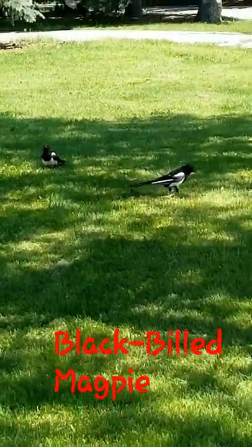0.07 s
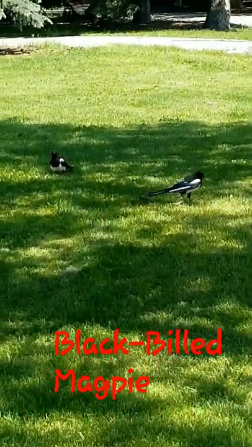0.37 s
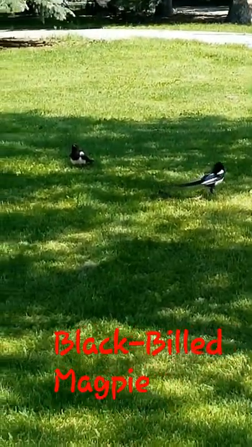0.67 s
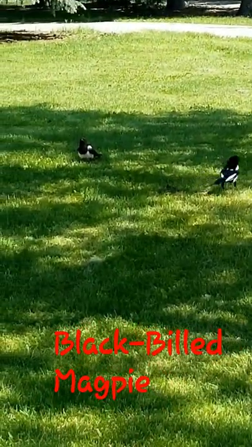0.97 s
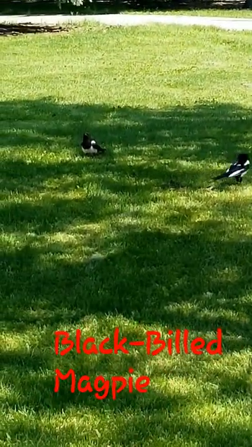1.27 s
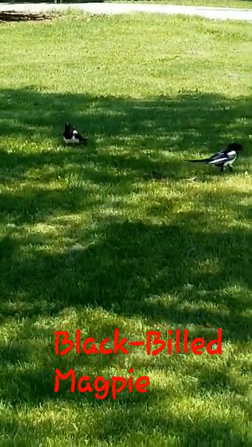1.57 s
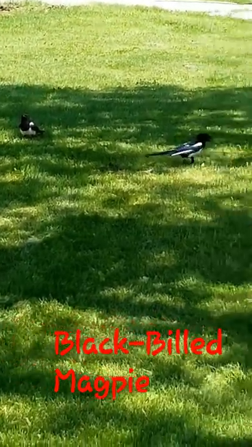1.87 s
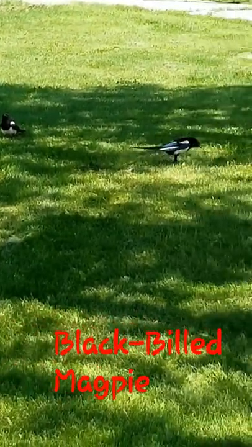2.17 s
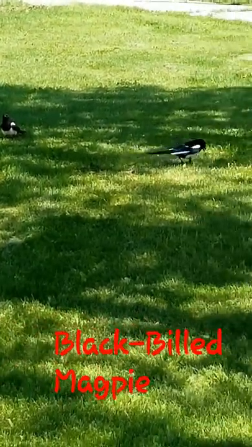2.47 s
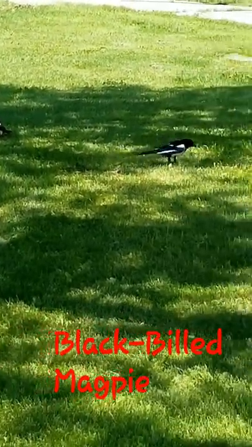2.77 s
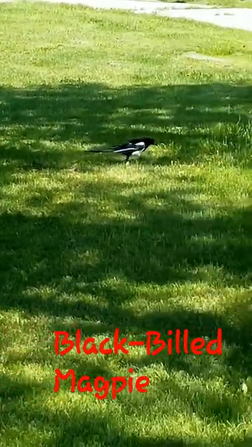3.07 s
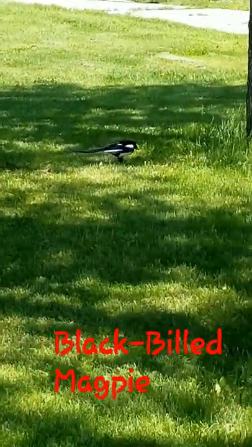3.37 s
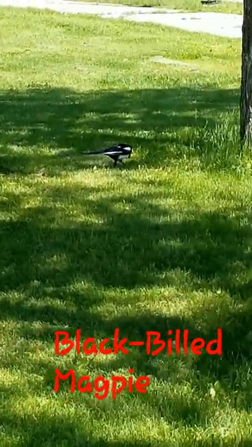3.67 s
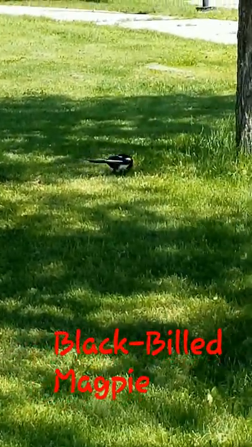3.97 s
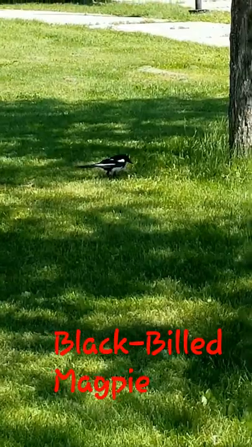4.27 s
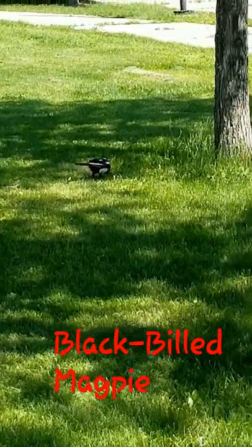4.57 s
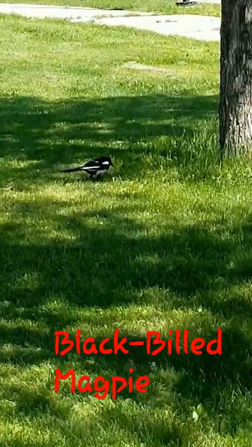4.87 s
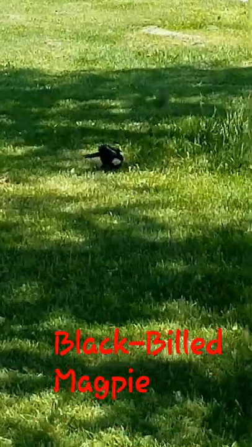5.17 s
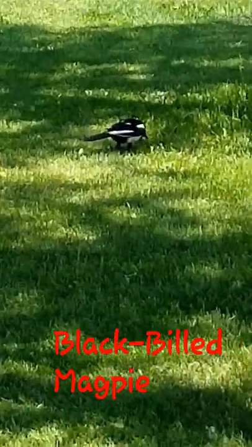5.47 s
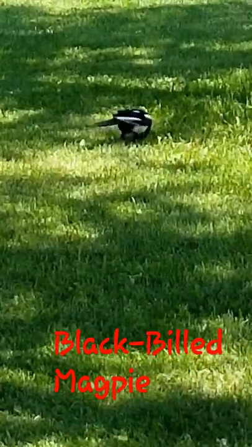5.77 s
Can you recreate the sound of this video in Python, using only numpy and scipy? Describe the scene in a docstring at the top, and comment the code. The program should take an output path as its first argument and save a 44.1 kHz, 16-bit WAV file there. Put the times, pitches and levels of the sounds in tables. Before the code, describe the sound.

A low engine drone runs throughout, slowly speeding up over a rumble of far traffic and soft wind on the microphones. In the first half, a magpie makes three short dry rasps while a songbird warbles and distant birds twitter faintly around the park. Near the end the vehicle goes by with a throbbing exhaust and a swell of tyre noise, then recedes. The right side sounds duller than the left.

```python
"""A park lawn beside a road

A vehicle's exhaust drones in harmonics of its engine cycle, slowly speeds up and goes by in a rush
of tyre noise. Distant traffic rumbles, a breeze flutters at the microphones and a thin hiss swells
briefly. A songbird warbles in gliding tones, scattered by the trees, and far birds twitter; a nearer
bird gives three dry rasps of ringing clicks. The right microphone is duller than the left."""
import sys
import numpy as np
from scipy import signal
from scipy.fft import rfft, irfft, next_fast_len
from scipy.io import wavfile
from scipy.ndimage import uniform_filter1d, map_coordinates

SR = 44100
rng = np.random.default_rng(int(sys.argv[2]) if len(sys.argv) > 2 else 0)


def transcribe(u):
    """Save the signal u as a 16-bit wav file named by the first command-line argument.

    u: samples, shape (n,) or (channels, n), limited to [-1, 1]; the rate is SR.
    q: integer samples, one column per channel.
    """
    v = np.clip(np.atleast_2d(u).T, -1, 1)
    q = np.round(v * 32767).astype(np.int16)
    wavfile.write(sys.argv[1], SR, q)


N = 256662
T = np.arange(N) / SR


def amp(db):
    """Amplitude ratio of a level in decibels."""
    return 10 ** (np.asarray(db) / 20)


def unit(x):
    """Normalisation to an rms of 1."""
    return x / np.sqrt(np.mean(x ** 2) + 1e-20)


def along(points, hz):
    """Interpolation of (f, value) points on a logarithmic frequency axis."""
    f, value = np.transpose(points)
    return np.interp(np.log(hz + 1), np.log(f + 1), value)


def curve(points):
    """Linear interpolation of (t, value) points at every sample."""
    return np.interp(T, *np.transpose(points))


def wobble(rate):
    """Smooth random modulation: a spline through rate Gaussian knots a second."""
    return map_coordinates(rng.standard_normal(int(N * rate / SR) + 4), [T * rate])


def filtered(x, response):
    """Linear filtering: the spectrum of x is multiplied by a frequency response."""
    size = next_fast_len(N + SR // 2)
    return irfft(rfft(x, size) * response(np.fft.rfftfreq(size, 1 / SR)), size)[..., :N]


# likeness of the ambient sound at left and right: f/Hz, correlation
AMBIENT_CORRELATION = [(30, 0.44), (100, 0.99), (300, 0.95), (650, 0.94), (1300, 0.6), (1900, 0.7),
                       (3000, 0.22), (6000, 0.15), (12000, 0.05)]
def rush(spectrum, patchy_db, correlation=AMBIENT_CORRELATION):
    """Partially coherent stereo noise of rms 1, its level varying in patches of time and frequency."""
    def mid_side_gains(hz):
        angle = np.arccos(np.clip(along(correlation, hz), -1, 1)) / 2
        return amp(along(spectrum, hz)) * [np.cos(angle), np.sin(angle)]
    cells = signal.stft(rng.standard_normal((2, N)), nperseg=512)[2]
    patches = uniform_filter1d(rng.standard_normal(cells.shape[1:]), size=5, axis=0)
    patches = unit(uniform_filter1d(patches, size=16, axis=1))
    noise = signal.istft(cells * amp(patchy_db * patches), nperseg=512)[1][:, :N]
    mid, side = filtered(noise, mid_side_gains)
    return unit(np.array([mid + side, mid - side]))


# spectra of a low rumble and of an even background hiss, notched near 9 kHz: f/Hz, relative level/dB
RUMBLE_SPECTRUM = [(20, -38), (33, -18), (45, -9), (65, 3), (85, 2.5), (135, -2), (170, -10), (240, -10.5),
                   (310, -25.5), (450, -30.5), (900, -81)]
BACKGROUND_SPECTRUM = [(100, -16.5), (300, 3), (650, 1), (1000, -2), (1600, -5.5), (2100, -10.5),
                       (2700, -14.5), (4000, -20), (5500, -25.5), (7600, -25), (9300, -50), (11200, -31),
                       (14500, -33)]
# their envelopes: t/s, level/dB
RUMBLE_LEVEL = [(0, -34), (.55, -34.5), (1.7, -34), (2.7, -36), (3.6, -35.5), (4.5, -30.5), (5.82, -34.5)]
BACKGROUND_LEVEL = [(0, -48.5), (2.2, -48.5), (3, -47.5), (3.8, -48.5), (5.82, -49)]
def background():
    """Incoherent addition: distant traffic merges into a low rumble, heard under an even hiss."""
    rumble = amp(curve(RUMBLE_LEVEL)) * rush(RUMBLE_SPECTRUM, patchy_db=0.82)
    hiss = amp(curve(BACKGROUND_LEVEL) + 0.12 * wobble(3.5)) * rush(BACKGROUND_SPECTRUM, patchy_db=0.82)
    return rumble + hiss


# spectrum of wind pressure: f/Hz, relative level/dB
BREEZE_SPECTRUM = [(20, -28), (35, -8), (50, 6), (70, -2), (130, -20.5), (300, -73.5)]
def breeze(left_db=-46.5, right_db=-53.5, gust_db=3):
    """Turbulence: pressure flutters independently at each microphone; the left faces the breeze."""
    flutter = unit(filtered(rng.standard_normal((2, N)), lambda hz: amp(along(BREEZE_SPECTRUM, hz))))
    gusts = amp(gust_db * wobble(3.9))
    return amp([[left_db], [right_db]]) * gusts * flutter


# envelope of the drone at the firing frequency: t/s, level/dB
DRONE_LEVEL = [(0, -35.5), (1.2, -31), (1.8, -45), (1.95, -31), (2.35, -31.5), (2.6, -28), (2.76, -34.5),
               (2.93, -27), (3.25, -29), (3.5, -33), (4.05, -34), (4.27, -27), (4.48, -29), (4.59, -38),
               (4.66, -28.5), (4.99, -24.5), (5.15, -36.5), (5.27, -27), (5.4, -38), (5.6, -30),
               (5.82, -39.5)]
# low harmonics of the engine cycle, swelling in turn: order, peak level/dB, peak t/s, slope/(dB/s)
LOW_ORDERS = [(2, -36, 4.85, 8), (3, -35, 6.2, 20.5), (4, -32.5, 5.55, 17.5)]
# surges of harshness in the exhaust: t/s, relative level/dB
THROB_LEVEL = [(0, -4.5), (1.5, -10), (2.85, -6), (3.1, 0), (3.35, -5.5), (4.0, -5), (4.33, 0), (4.5, -0.5),
               (4.66, 3.5), (4.79, -1.5), (4.97, 3.5), (5.13, 2), (5.4, -23)]
# upper harmonics: order, base level/dB, multiplier of the throb level
UPPER_ORDERS = [(6, -43, 2.5), (7, -45, 0.46), (8, -46, 0.95), (9, -39, 1.9), (10, -52, 0.93),
                (11, -51.5, 0.51), (12, -53, 0.4), (14, -56.5, 0.84)]
def exhaust(firing_phase, firings_per_cycle=5, floor_db=-47.5):
    """Harmonic series: periodic firing gives the drone, and uneven cylinders add the other orders."""
    tone = amp(curve(DRONE_LEVEL) + .8 * wobble(12)) * np.sin(firing_phase + .3 * wobble(10))
    levels = [(order, np.maximum(db - slope * np.abs(T - peak_s), floor_db))
              for order, db, peak_s, slope in LOW_ORDERS]
    levels += [(order, db + follow * curve(THROB_LEVEL)) for order, db, follow in UPPER_ORDERS]
    for order, level_db in levels:
        phase = order * firing_phase / firings_per_cycle + rng.uniform(0, 2 * np.pi) + 0.55 * wobble(9)
        tone += amp(level_db + 1.2 * wobble(7)) * np.sin(phase)
    return np.sqrt(2) * tone  # the levels are rms


# spectra of tyre hiss and of tread roar: f/Hz, relative level/dB
HISS_SPECTRUM = [(900, -30), (1500, -5.5), (1740, 0.5), (2100, -5), (2400, -1.5), (2720, -2.5), (3150, -8),
                 (4700, -16), (5400, -12.5), (6100, -22.5), (7700, -24.5), (9000, -53), (12000, -66.5)]
ROAR_SPECTRUM = [(150, -11.5), (350, 1), (520, -3), (660, 4.5), (820, -2), (950, 3.5), (1050, 4),
                 (1200, 0.5), (1700, -3), (2100, -18), (2640, -6), (3500, -58)]
# envelope of the tread roar: t/s, level/dB
ROAR_LEVEL = [(3.6, -69), (4.3, -53.5), (4.55, -52.5), (4.63, -43), (4.72, -46), (4.98, -44.5),
              (5.12, -47.5), (5.4, -69.5)]
# likeness of the vehicle's noise at left and right: f/Hz, correlation
VEHICLE_CORRELATION = [(100, 0.97), (900, 0.85), (1900, .72), (2800, 0.24), (4000, .45), (6000, .15)]
def road_noise(firing_phase, arrive_s=4.585, leave_s=5.073):
    """A passing noise source: tyres and body grow louder on approach and fade with distance."""
    approach_db = 30 * np.minimum(T - arrive_s, 0)
    abreast_db = 5 * (np.clip(T, arrive_s, leave_s) - arrive_s)
    recede_db = -47 * np.maximum(T - leave_s, 0)
    nearness = amp(approach_db + abreast_db + recede_db)
    hiss = amp(-50) * rush(HISS_SPECTRUM, patchy_db=1.3, correlation=VEHICLE_CORRELATION)
    roar = amp(curve(ROAR_LEVEL)) * rush(ROAR_SPECTRUM, patchy_db=2.5, correlation=VEHICLE_CORRELATION)
    body = amp(-39.5) * rush(RUMBLE_SPECTRUM, patchy_db=-1.0, correlation=VEHICLE_CORRELATION)
    puffs = 1 + 0.08 * np.sin(firing_phase)  # each firing pushes out a puff of noise
    return nearness * (body + hiss * puffs) + roar * puffs


# firing frequency, rising and then holding: t/s, f/Hz
FIRING_RATE = [(0, 94.05), (.5, 94.8), (2, 102), (4, 112.7), (5, 127.2), (5.82, 127)]
def vehicle():
    """Phase is the integral of frequency: one firing phase drives the exhaust and pulses the noise."""
    firing_phase = 2 * np.pi * np.cumsum(curve(FIRING_RATE)) / SR
    return exhaust(firing_phase) + road_noise(firing_phase)


# spectrum of the thin hiss: f/Hz, relative level/dB
SIZZLE_SPECTRUM = [(2000, -20.0), (5000, -6.0), (9000, -23.0), (11500, -1.0), (14500, -5.5)]
def sizzle(hold_from_s=.12, hold_to_s=.24, attack_s=.045, release_s=.08):
    """Exponential growth and decay: a thin high hiss swells, holds and fades to a faint tail."""
    swell = np.exp(np.minimum(T - hold_from_s, 0) / attack_s - np.maximum(T - hold_to_s, 0) / release_s)
    tail = amp(-65.5 - 8.5 * T)
    return np.maximum(amp(-56) * swell, tail) * rush(SIZZLE_SPECTRUM, patchy_db=3.5)


def trees(x, t60, wet_db):
    """Scattering: trunks and leaves add a decaying tail to a mono sound, different on each side."""
    t = T[:SR]
    tail = rng.standard_normal((2, SR)) * amp(-60 * t / t60) * (1 - np.exp(-t / 0.0013))
    scattered = signal.fftconvolve(x[None], tail / np.linalg.norm(tail[0]), axes=1)[:, :N]
    return x + amp(wet_db) * scattered


def whistle(length_s, pitches, flutter_hz=35, flutters_per_s=220):
    """Frequency modulation: a soft-edged syllable bends through three pitches with a quick flutter."""
    progress = np.linspace(0, 1, int(length_s * SR))
    flutter = map_coordinates(rng.standard_normal(SR // 100), [progress * length_s * flutters_per_s])
    hz = np.polyval(np.polyfit([0, .5, 1], pitches, 2), progress) + flutter_hz * flutter
    envelope = np.abs(np.sin(np.pi * progress)) ** .5
    return envelope * np.sin(2 * np.pi * np.cumsum(hz) / SR)


# syllables of the warble: t/s, duration/s, start f/Hz, end f/Hz, upward bow at the middle/Hz, level/dB
SYLLABLES = [(.175, .035, 4200, 4400, 50, -63), (.303, .034, 3900, 4020, 40, -58),
             (.425, .03, 4020, 3780, 0, -62), (.455, .03, 3880, 4100, 0, -62.5),
             (.513, .03, 3340, 3230, -20, -56), (.584, .03, 4420, 4200, 0, -60),
             (.618, .072, 4030, 3370, 60, -60), (.745, .04, 3330, 3830, 150, -56.5),
             (.955, .06, 3100, 3020, -50, -57), (1.047, .035, 3200, 3600, -80, -60.5),
             (1.078, .036, 3780, 3830, 30, -59.5), (1.118, .056, 4150, 3800, 71, -58),
             (1.213, .048, 3470, 3220, 0, -58.5), (1.24, .032, 4150, 4250, 0, -60),
             (1.255, .054, 3230, 3040, -30, -55), (1.33, .068, 4000, 3450, 34, -65),
             (1.445, .08, 2770, 2660, -40, -64), (1.461, .032, 3170, 3180, -10, -57),
             (1.59, .07, 2750, 2600, 0, -64.5), (1.79, .14, 3130, 3080, 0, -68),
             (2.075, .03, 3900, 3780, 0, -63), (2.102, .042, 3720, 3350, 40, -58.5),
             (2.292, .032, 2480, 3020, 0, -60), (2.324, .044, 3150, 3880, 150, -61.5),
             (2.49, .048, 3650, 3250, 0, -65), (2.61, .056, 3000, 2740, 0, -62.5),
             (2.668, .09, 3880, 3330, 210, -59.5)]
def songbird(burr_depth=.5, burr_rate=320):
    """Amplitude modulation: a rapid, rough flutter widens each whistled syllable into a burry note."""
    song = np.zeros(N)
    for onset, length_s, start_hz, end_hz, bow_hz, db in SYLLABLES:
        note = amp(db) * whistle(length_s, [start_hz, (start_hz + end_hz) / 2 + bow_hz, end_hz])
        song[int(onset * SR):][:len(note)] += note
    burr = 1 + burr_depth * wobble(burr_rate)
    flicker = amp(0.5 * wobble(44.7))  # moving leaves
    return trees(song * burr * flicker, t60=.42, wet_db=-9)


# rasps: t/s, base click level/dB, low mode f/Hz, its relative level/dB, high mode f/Hz,
# after-click relative level/dB, airy noise level/dB, closing tick level/dB
RASPS = [(.236, -41.5, 4700, 2, 7370, -2.5, -56.5, -40), (1.170, -49.5, 4750, -2, 7200, -2, -57.5, -43.5),
         (1.934, -40.5, 4750, -1, 6050, -13, -56.5, -42.5)]
# modes of the closing tick: f/Hz, relative level/dB, t60/s
TICK_MODES = [(2040, 1, 0.013), (2610, -1, 0.011), (2900, 2, 0.024), (3300, -9, .007)]
# spectrum of the snaps and airy noise: f/Hz, relative level/dB
RASP_SPECTRUM = [(2500, -9), (3800, -3.5), (4700, 4), (5300, 0), (5900, -1.5), (6400, -1), (7300, -2),
                 (8200, 0.5), (9300, -19.5), (12000, -17), (15000, -25)]
def rasping_bird(pairs=3, gap_s=.0172, after_s=.0066, growth_db=1, ring_t60=.013, tick_s=.0598):
    """Damped resonance: each rasp is pairs of ringing clicks over airy noise, closed by a lower tick."""
    noise_envelope, tones = np.zeros((2, N))
    t = T[:SR // 50]
    attack = 1 - np.exp(-t / .0004)
    snap = amp(-6.5) * t / .0005 * np.exp(1 - t / .0005)
    ring = amp(-1.5 - 60 * t / ring_t60) * attack
    tick = attack * sum(amp(db - 60 * t / t60) * np.sin(2 * np.pi * hz * t) for hz, db, t60 in TICK_MODES)
    for onset, click_db, low_hz, low_db, high_hz, after_db, air_db, tick_db in RASPS:
        noise_envelope += amp(air_db) * np.exp(-((T - onset - .033) / .043) ** 2)  # airy swell
        click = (0, click_db, [(low_hz, low_db), (high_hz, 0)])
        after_click = (after_s, click_db + after_db, [(high_hz, 0)])
        for k in range(pairs):
            for delay, db, modes in (click, after_click):
                start = int((onset + k * gap_s + delay) * SR)
                gain = amp(db + (k + 1) * growth_db)
                noise_envelope[start:][:len(t)] += gain * snap
                for hz, mode_db in modes:
                    mode = np.sin(2 * np.pi * hz * rng.normal(1, 0.011) * t)
                    tones[start:][:len(t)] += gain * amp(mode_db) * ring * mode
        tones[int((onset + tick_s) * SR):][:len(t)] += amp(tick_db) * tick
    noise = unit(filtered(rng.standard_normal(N), lambda hz: amp(along(RASP_SPECTRUM, hz))))
    return trees(tones + noise_envelope * noise, t60=.2, wet_db=-17)


def far_twitter(count=100, start_s=.8, span_s=2.5):
    """Spectral broadening: a buzzing delivery smears the glides of far birds into narrow-band noise."""
    twitter = np.zeros(N)
    for when, size, pitch, bend in rng.uniform(size=(count, 4)):
        glide_hz = (2700 + 1700 * pitch) * (1 + 0.51 * (bend - .5) * np.array([-1, 0, 1]))
        note = amp(-71.5 - 0.5 * size) * whistle(0.033 + .04 * size, glide_hz)
        twitter[int((start_s + when * span_s) * SR):][:len(note)] += note
    return trees(twitter * wobble(700), t60=0.18, wet_db=-3.0)


# swells of the far chorus: t/s, half width/s, level/dB
CHORUS_SWELLS = [(0.905, .04, -70), (1.263, 0.055, -62), (2.218, 0.034, -66), (2.385, .04, -66),
                 (2.894, 0.048, -69), (3.123, 0.053, -66)]
# its spectrum: f/Hz, relative level/dB
CHORUS_SPECTRUM = [(2800, -30), (3500, -2), (4300, -2), (4900, -5), (5600, -29.5)]
def far_chorus():
    """Incoherent addition: far birds blur into a band of noise that comes in soft Gaussian swells."""
    envelope = sum(amp(db) * np.exp(-((T - peak_s) / width) ** 2) for peak_s, width, db in CHORUS_SWELLS)
    return envelope * rush(CHORUS_SPECTRUM, patchy_db=4.0)


def aside(pair, lag_samples):
    """Direction by time difference: a positive lag delays the right channel, placing a sound left."""
    delays_s = np.array([[0], [lag_samples]]) / SR
    return filtered(pair, lambda hz: np.exp(-2j * np.pi * hz * delays_s))


def scene():
    """Superposition: the vehicle and the birds lie on different sides within the ambient noise."""
    ambience = background() + breeze() + sizzle()
    road = aside(vehicle(), lag_samples=1.8)
    birds = aside(songbird() + rasping_bird() + far_twitter() + far_chorus(), lag_samples=-3.6)
    return ambience + road + birds


# imbalance of the microphones: f/Hz, left minus right level/dB
RIGHT_LOSS = [(100, 2), (1300, 1.8), (2500, 1.8), (4200, 9), (6000, 8.5), (7800, 50.5), (9500, 11),
              (11500, -5), (14500, 5.5)]
# phase lag of the right microphone: f/Hz, lag/rad
RIGHT_LAG = [(20, 2), (100, -0.33), (500, 0.47), (900, 0.53), (1350, 1.08), (1900, 1.78), (2700, 3),
             (3800, 4), (5200, 7), (14500, 12)]
def record(dry):
    """Frequency response: the right microphone lags and loses upper treble; both are band-limited."""
    def microphones(hz, top_hz=14600):
        right_gain = amp(-along(RIGHT_LOSS, hz))
        right = right_gain * np.exp(-1j * along(RIGHT_LAG, hz))
        rms_gain = np.sqrt((1 + right_gain ** 2) / 2)
        return np.array([np.ones_like(hz), right]) / rms_gain * (hz < top_hz)
    return filtered(dry, microphones)


dry = scene()
out = record(dry)
transcribe(out)
```